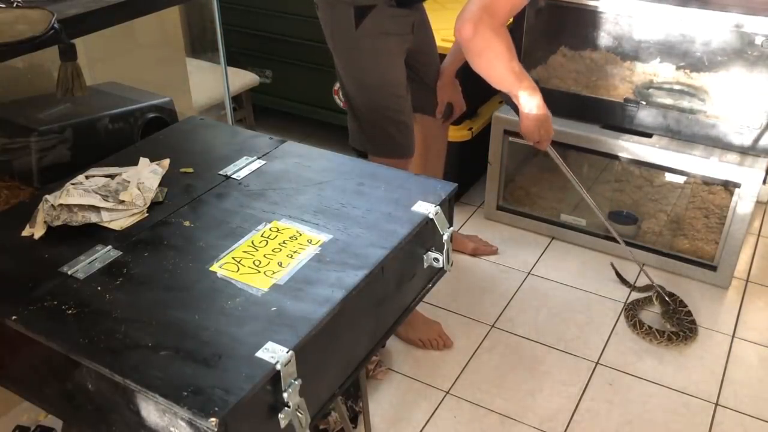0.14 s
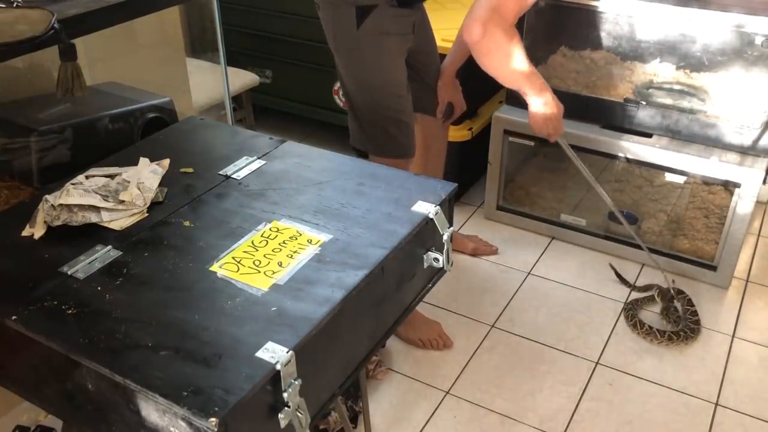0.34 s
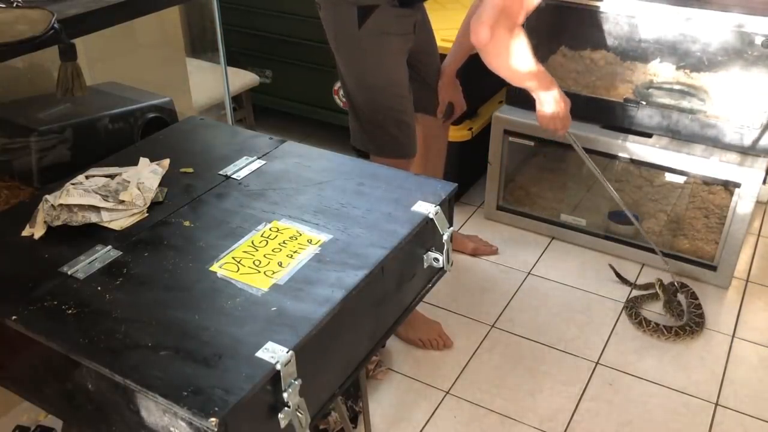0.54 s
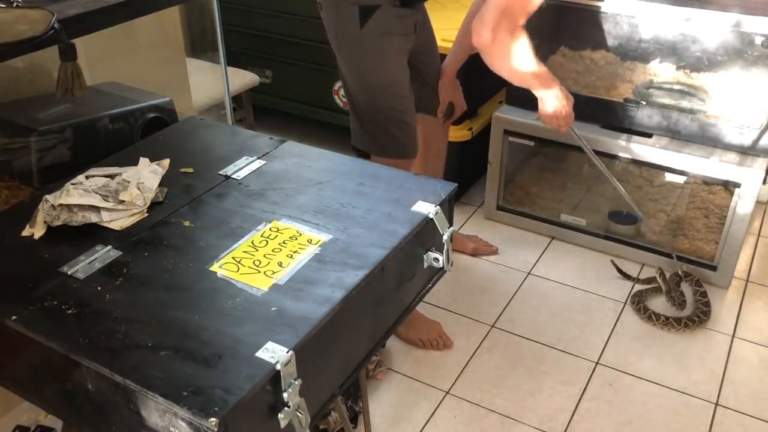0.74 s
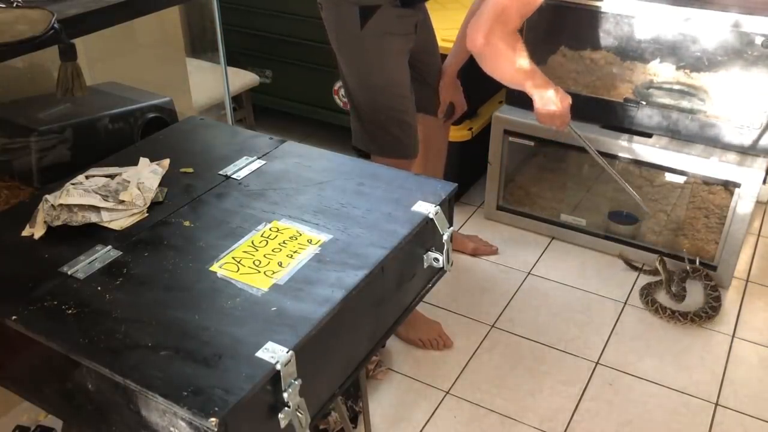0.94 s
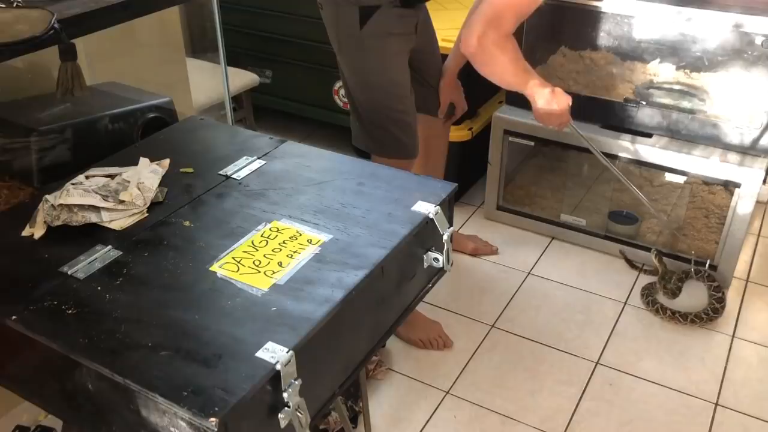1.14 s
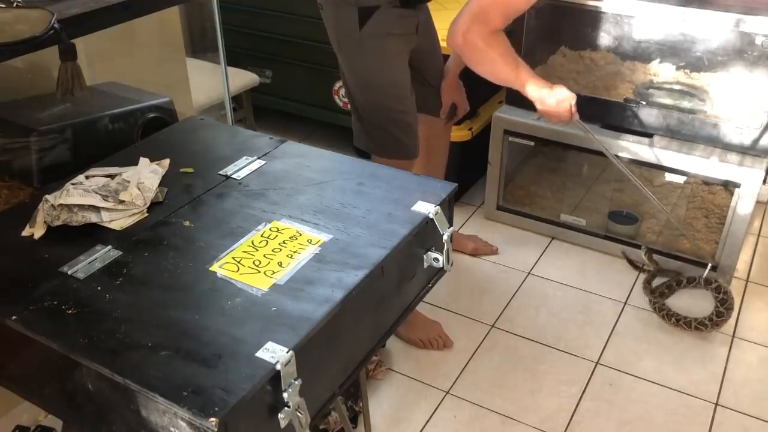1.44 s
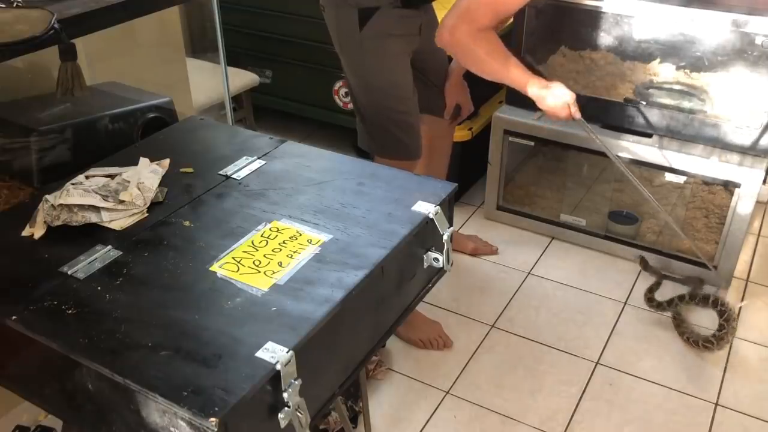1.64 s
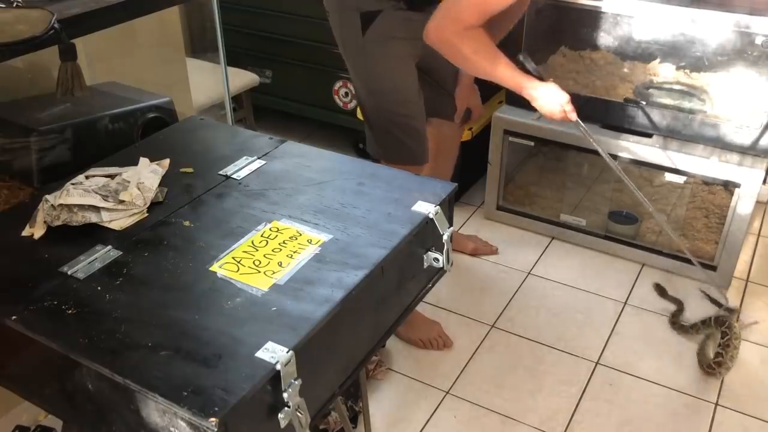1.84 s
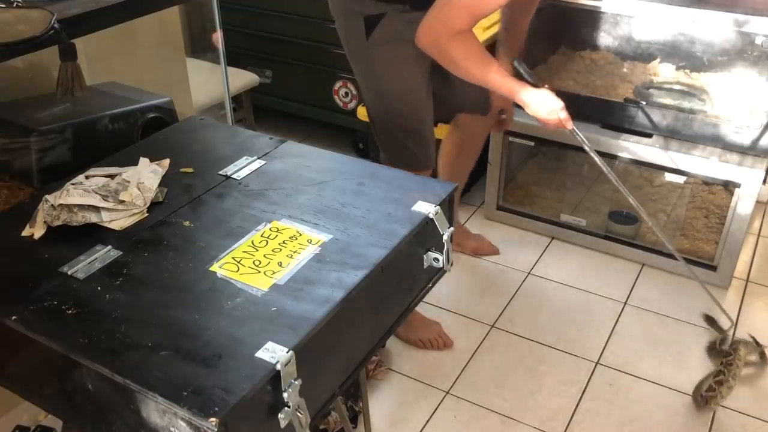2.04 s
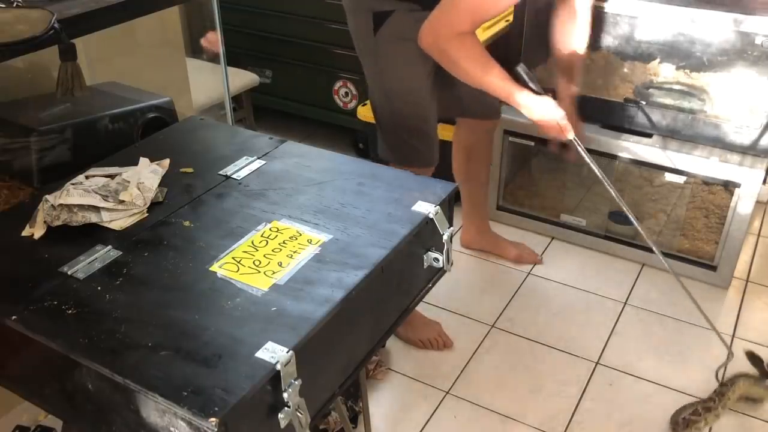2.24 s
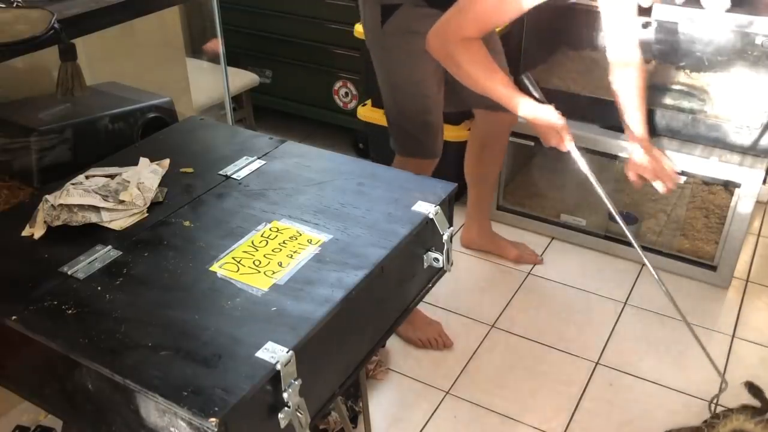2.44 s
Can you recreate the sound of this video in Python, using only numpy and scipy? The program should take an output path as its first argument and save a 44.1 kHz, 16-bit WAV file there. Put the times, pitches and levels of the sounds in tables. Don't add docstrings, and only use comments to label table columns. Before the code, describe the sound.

A rattlesnake shakes its tail without pause, a dense, bright, hissing buzz with irregular sharp ticks; low pump and fan hum sits beneath, a cricket chirps faintly, in a hard tiled room, miked fairly close.

```python
import sys
import numpy as np
from scipy import signal
from scipy.fft import rfft, irfft
from scipy.io import wavfile

SR = 44100
rng = np.random.default_rng(int(sys.argv[2]) if len(sys.argv) > 2 else 0)


def digitize_waveform(pressure):
    field = np.atleast_2d(pressure).T
    bounded = np.clip(field, -1, 1)
    quanta = np.round(bounded * 32767).astype(np.int16)
    wavfile.write(sys.argv[1], SR, quanta)


def volts(x):
    e = np.asarray(x, float) / 20
    return 10 ** e


N = 114660


def rattle(bright_db, shell_db):
    # f/Hz, level/dB
    horn_colour = [(1900, -28.5), (2150, -14), (3600, -9), (4600, 1.5), (5600, 1), (8300, -9), (12100, -13),
                   (15000, -6.5)]
    # f/Hz, bandwidth/Hz, level/dB
    shells = [(7100, 700, 2.5), (10000, 1500, 1.5), (3000, 500, 2), (13350, 900, 4.5)]
    # centre t/s, length/s, f/Hz, level/dB
    flares = [(.5, .07, 14500, 10), (.63, .06, 14200, 3), (0.652, .08, 3880, 2.5), (0.733, .15, 2480, 1.5),
              (.75, .08, 15300, 3), (.77, 0.045, 4070, 3), (.83, .09, 13600, 2), (0.887, 0.11, 4730, 4),
              (1, 0.096, 2500, 4), (1.076, .12, 6200, 0), (1.117, 0.062, 10500, 5), (1.34, 0.098, 13800, 1),
              (1.403, 0.25, 10500, 3.5), (1.52, .08, 15300, 0), (1.527, 0.13, 6400, 5),
              (1.544, 0.086, 4500, 2.5), (1.63, .25, 11900, 3), (1.73, .17, 8440, 3),
              (1.74, 0.12, 11000, 2), (1.76, .1, 13200, 7), (1.82, 0.08, 4840, 3), (1.85, 0.1, 6400, 4),
              (1.91, 0.15, 3200, 4), (2.116, 0.21, 3370, 5), (2.273, 0.039, 5240, 9), (2.05, .2, 4900, 1),
              (2.3, .03, 5000, -3), (.16, 0.044, 5400, 5), (1.21, 0.14, 6140, 1.5), (2.38, 0.16, 7400, 2.5),
              (2.387, 0.048, 4600, -1), (2.51, .12, 3120, 4.5), (2.52, 0.2, 7900, 4.5),
              (1.4, 0.39, 3130, -4.5), (2.5, 0.36, 5700, -3)]
    swings_hz, swing_wander, swing_depth_db = 54.2, .05, 1.1
    clacks_per_s, clack_spread_db = 9000, 2.3
    crisp_per_s, crisp_spread_db = 8000, 3.0
    band_step_hz, flare_width_hz, patch_db = 700, 570, 1.0
    main_shell_hz, main_shell_width_hz = 4600, 1000

    phase = 2 * np.pi * np.cumsum(swings_hz * (1 + swing_wander * drift(3))) / SR
    swing = np.cos(2 * phase) + .3 * np.cos(phase) + 0.63 * np.cos(4 * phase)
    together_db = 1.1 * (.4 * drift(10) + .9 * drift(36) + 1.1 * drift(90))
    gate = volts(swing_depth_db * swing + together_db)

    hz = np.fft.rfftfreq(N, 1 / SR) + 1
    crisp = np.pi / 2 * np.clip((hz - 5000) / 5000, 0, 1)
    tip = np.pi / 2 * np.clip((hz - 9500) / 4500, 0, 1)
    top = np.cos(tip) * rfft(clatter(crisp_per_s * gate, crisp_spread_db))
    top = top + np.sin(tip) * rfft(clatter(crisp_per_s * gate, crisp_spread_db))
    dense = rfft(clatter(clacks_per_s * gate, clack_spread_db))
    colour = volts(at_hz(horn_colour, hz) + peaks(shells, hz)) * (hz > 1700)
    horn = causal(colour) * (np.cos(crisp) * dense + np.sin(crisp) * top)

    out = np.zeros(N)
    t = np.arange(0, N, 100) / SR
    for centre in np.arange(1000, 17500, band_step_hz):
        share = np.cos(np.pi / 2 * np.clip((hz - centre) / band_step_hz, -1, 1)) ** 2
        flare_db = np.zeros(len(t))
        for s, length, f, db in flares:
            flare_db += db * np.exp(-((centre - f) / flare_width_hz) ** 2 - (2 * (t - s) / length) ** 2)
        level = np.interp(np.arange(N) / SR, t, flare_db)
        level = level + bright_db * np.clip(np.log2(centre / 6000), 0, 1)
        level = level + shell_db * np.exp(-((centre - main_shell_hz) / main_shell_width_hz) ** 2)
        level = level + patch_db * drift(22)
        out += volts(level) * irfft(share * horn, N)
    return rms_one(out)


def clatter(per_s, spread_db):
    sizes = volts(spread_db * np.minimum(rng.exponential(1, N), 5)) * rng.choice([-1, 1], N)
    return rms_one(sizes * (rng.random(N) < per_s / SR))


def knocks():
    # t/s, peak level/dB, f/Hz
    touches = [(.034, -25, 13500), (.1605, -19, 14200), (.173, -28, 10000), (.244, -24, 13500),
               (.299, -24, 10500), (.393, -24, 14000), (.4875, -19, 10500), (.488, -23, 7300),
               (.495, -27, 14600), (.602, -27, 14100), (.623, -23, 14200), (.686, -23, 5500),
               (.745, -26, 10000), (1.089, -25, 11000), (1.1145, -21, 4900), (1.1158, -20, 6500),
               (1.1166, -19, 9800), (1.138, -22, 5000), (1.261, -26, 10200), (1.288, -25, 13600),
               (1.323, -24, 5500), (1.535, -26, 12900), (1.72, -25, 10500), (1.763, -24, 13400),
               (2.259, -23, 5500), (2.325, -25, 7100), (2.561, -25, 8500)]
    ring_cycles, trim_db, spread_s = 20, 3.5, .0015
    rings, ticks = np.zeros(N), np.full(N, 1e-18)
    later = np.array([0, 1, 1])
    for s, db, hz in touches:
        delay_luck, level_luck = rng.random((2, 3))
        times = s + spread_s * (.3 + delay_luck) * later
        click = np.zeros(N)
        click[(times * SR).astype(int)] = volts(db + trim_db - (4 + 4 * level_luck) * later)
        rings += ring(click, hz, ring_cycles / hz)
        ticks += click
    thin = signal.sosfilt(signal.butter(2, 5500, "high", fs=SR, output="sos"), ticks)
    return signal.sosfilt(signal.butter(4, 3800, "high", fs=SR, output="sos"), thin + 1.2 * rings)


def drag():
    start_s, end_s, edge_s, level_db = 2.08, 2.5, 0.021, -55.0
    t = np.arange(N) / SR
    rustle = signal.butter(2, [550, 1600], "band", fs=SR, output="sos")
    grit = rms_one(signal.sosfilt(rustle, clatter(2500, 2.7)))
    fade = np.clip(np.minimum(t - start_s, end_s - t) / edge_s, 0, 1)
    return volts(level_db + 1.3 * drift(8.6)) * grit * fade


def cricket():
    # start t/s, length/s, level/dB
    chirps = [(.08, .16, -56), (.3, .1, -60), (.48, .1, -57), (.8, .09, -57), (1.09, .11, -54.5),
              (1.24, .05, -58), (1.39, .13, -54.5), (1.54, .18, -56), (1.74, .19, -54.5), (1.95, .07, -57),
              (2.1, .07, -54), (2.18, .14, -57), (2.38, .22, -54)]
    harp_hz, strokes_hz, edge_s, trim_db = 2212, 37, .02, -1.2
    t = np.arange(N) / SR
    count = np.floor(t * strokes_hz + 0.082 * drift(7.9))
    strokes = np.diff(count, prepend=0) * volts(1.4 * drift(30))
    song = rms_one(ring(ring(strokes, harp_hz, .1), harp_hz, .02))
    envelope = np.zeros(N)
    for s, length, db in chirps:
        inside_s = np.minimum(t - s, s + length - t)
        envelope += volts(db + trim_db) * np.clip(inside_s / edge_s + .5, 0, 1)
    return song * envelope


def machines():
    # f/Hz, rms level/dB
    hum = [(52.4, -66), (94.2, -57.5), (120.0, -52.5), (136.0, -51), (2223.0, -66), (707.0, -68),
           (2186.0, -69)]
    # f/Hz, level/dB
    air_colour = [(150, -5), (200, 0.5), (320, -1), (530, -8), (700, -8.5), (1100, -12), (1800, -17),
                  (2400, -20)]
    # f/Hz, bandwidth/Hz, level/dB
    booms = [(210, 25, 3.5), (317, 24, 3.5)]
    waver_db, air_db, air_lump_db, air_low_hz, rumble_db = 0.5, -44, 1.3, 121, -61.5
    t = np.arange(N) / SR
    tones = np.zeros(N)
    for f, db in hum:
        sine = np.sin(2 * np.pi * (f * t + rng.random()))
        tones += np.sqrt(2) * volts(db + waver_db * drift(4.5)) * sine
    hz = np.fft.rfftfreq(N, 1 / SR) + 1
    shape = volts(at_hz(air_colour, hz) + peaks(booms, hz))
    shape = shape / np.sqrt(1 + (air_low_hz / hz) ** 6) / np.sqrt(1 + (hz / 3000) ** 4)
    air = rms_one(irfft(rfft(rng.standard_normal(N)) * shape, N))
    rumble = band(43, 96, order=2)
    return tones + volts(air_db + air_lump_db * drift(4.4)) * air + volts(rumble_db) * rumble


def room(x):
    t60_s, first_echo_s = .3, .004
    t = np.arange(SR // 2) / SR
    tail = rng.standard_normal(len(t)) * volts(-60 * t / t60_s) * (t > first_echo_s)
    return signal.fftconvolve(x, tail / np.sqrt(np.sum(tail ** 2)))[:N]


def ring(clicks, hz, t60):
    r, w = volts(-60 / (t60 * SR)), 2 * np.pi * hz / SR
    return signal.lfilter([0, np.sin(w)], [1, -2 * r * np.cos(w), r * r], clicks + 1e-18)


def causal(gain):
    fold = irfft(np.log(gain + 1e-4), N)
    index = np.arange(N)
    return np.exp(rfft(fold * 2 * (index < N // 2) - fold[0] * (index == 0)))


def peaks(rows, hz):
    return sum(db / (1 + (2 * (hz - f) / width) ** 2) for f, width, db in rows)


def at_hz(points, hz):
    f, db = np.transpose(points)
    return np.interp(np.log(hz), np.log(f), db)


def band(low_hz, high_hz, order=4):
    sos = signal.butter(order, [low_hz, high_hz], "band", fs=SR, output="sos")
    return rms_one(signal.sosfilt(sos, rng.standard_normal(N)))


def drift(rate):
    r = np.exp(-80 * np.pi * rate / SR)
    slow = signal.lfilter([1], [1, -2 * r, r * r], rng.standard_normal(N // 40 + 2002))[2000:]
    return np.interp(np.arange(N) / 40, np.arange(len(slow)), rms_one(slow))


def rms_one(x):
    return x / np.sqrt(np.mean(x ** 2) + 1e-20)


def scene():
    # t/s, rattle level/dB, brightness/dB, main shell level/dB
    shake = [(0, -36.5, 3, 4), (.02, -29.5, 0.5, 0), (.18, -32, 2, 3), (.42, -30.5, -0.5, 0),
             (.73, -29.5, 1, 1), (.86, -30, 2.5, 3), (.97, -32, 1.5, 2), (1.11, -29.5, 3.5, 1),
             (1.22, -32.5, 3, 4), (1.3, -29.5, 2.5, 0.5), (1.55, -31.5, 4, 3.5), (1.66, -29.5, 1, -1),
             (1.82, -30, 3, 3), (1.92, -31.5, 3, 3), (2.26, -30.5, 2, 1), (2.3, -33, 2.5, 1.5),
             (2.38, -31, 3.5, 3), (2.6, -30.5, 2, 0.5)]
    room_db = -8.0
    s, *columns = np.transpose(shake)
    level_db, bright_db, shell_db = [np.interp(np.arange(N) / SR, s, column) for column in columns]
    clacks, ticks = rattle(bright_db, shell_db), knocks()
    snake = volts(level_db) * rms_one(clacks + volts(room_db) * room(clacks))
    knocking = ticks + volts(room_db) * room(ticks)
    mono = snake + knocking + drag() + cricket() + machines()
    return np.array([mono, mono])


def band_limit(x):
    return signal.sosfilt(signal.butter(12, 17030, fs=SR, output="sos"), x)


def record(dry):
    # centre t/s, low f/Hz, high f/Hz, level/dB
    slips = [
        (1.839, 8160, 11000, -40),
        (2.074, 12500, 13900, -42),
        (2.466, 4200, 5200, -33),
        (2.467, 5650, 7040, -38),
    ]
    slip_s, bass_cut_hz, top_cut_hz = .03, 40, 15715
    t = np.arange(N) / SR
    side = np.zeros(N)
    for s, low_hz, high_hz, db in slips:
        window = np.cos(np.pi * np.clip((t - s) / slip_s, -.5, .5))
        side += volts(db) * band(low_hz, high_hz, order=8) * window
    stereo = dry + side * [[1], [-1]]
    hz = np.fft.rfftfreq(N, 1 / SR) + 1
    passed = np.clip((top_cut_hz - hz) / 60 + .5, 0, 1) / np.sqrt(1 + (bass_cut_hz / hz) ** 8)
    return band_limit(irfft(rfft(stereo) * passed, N))


dry = scene()
out = record(dry)
digitize_waveform(out)
```